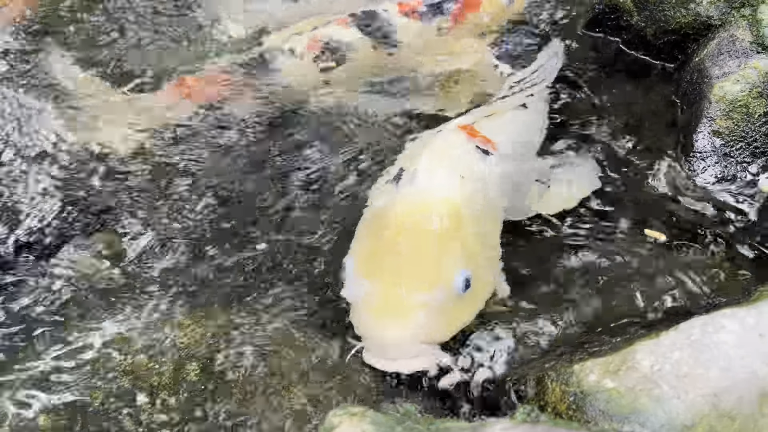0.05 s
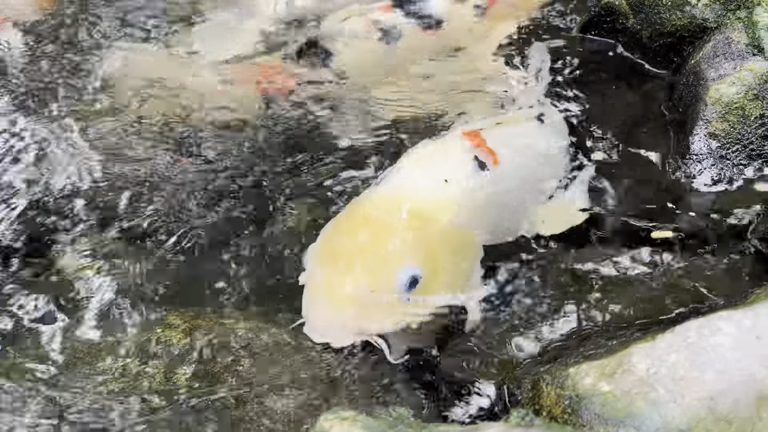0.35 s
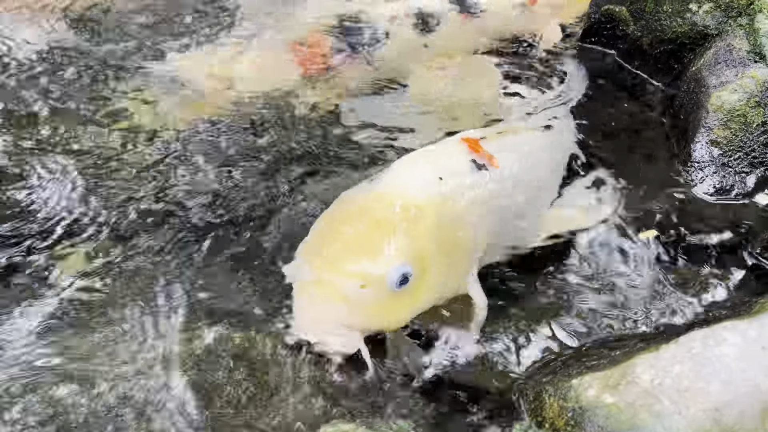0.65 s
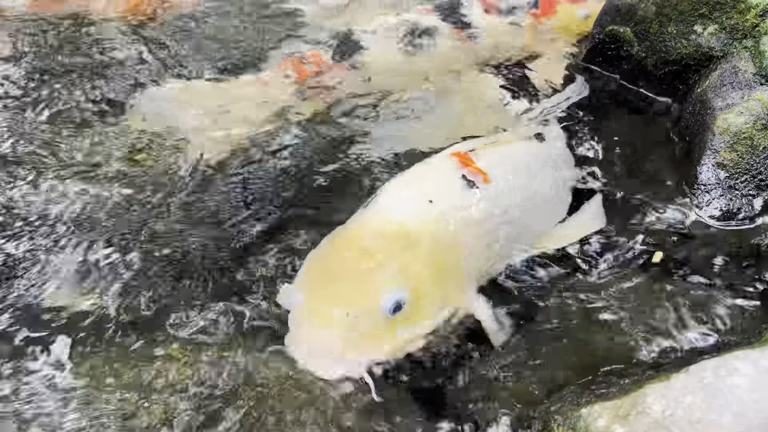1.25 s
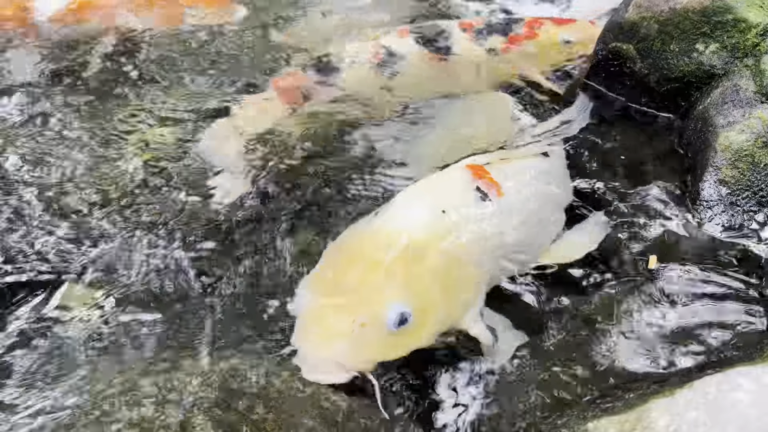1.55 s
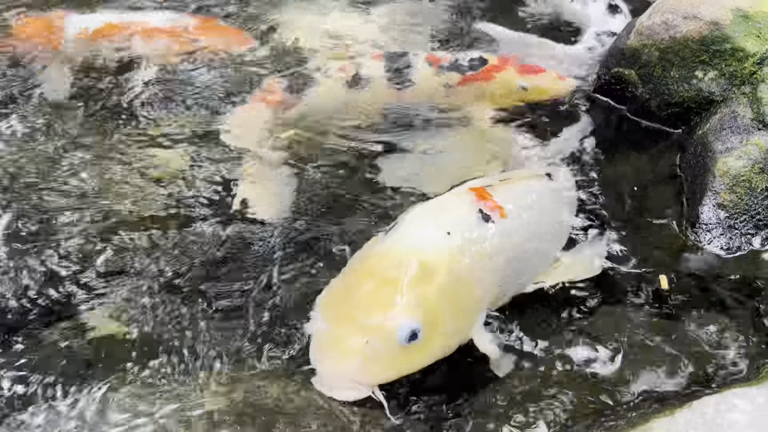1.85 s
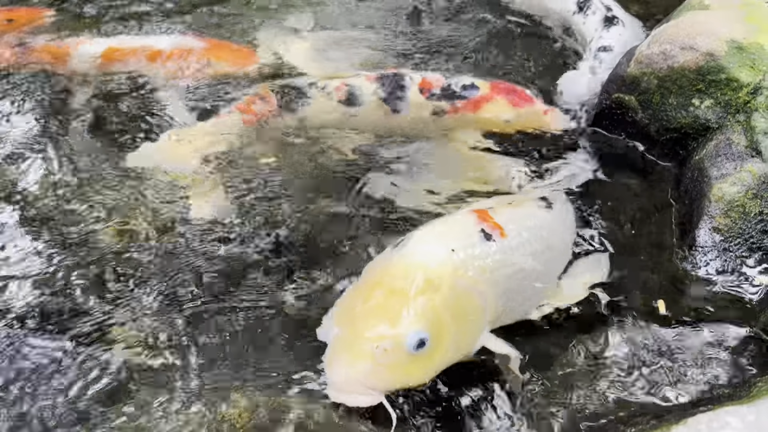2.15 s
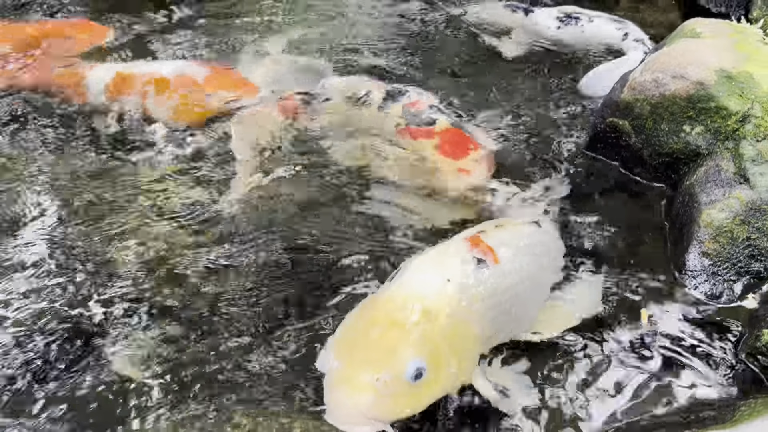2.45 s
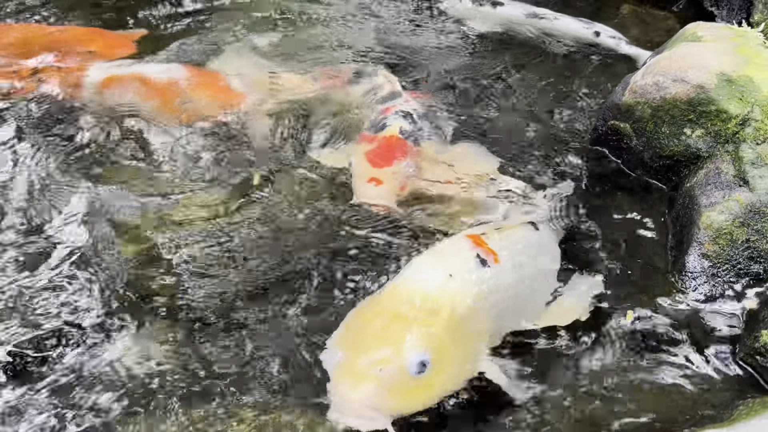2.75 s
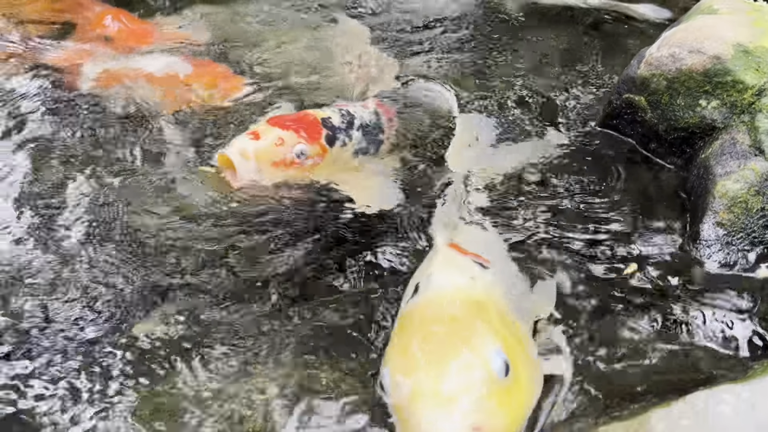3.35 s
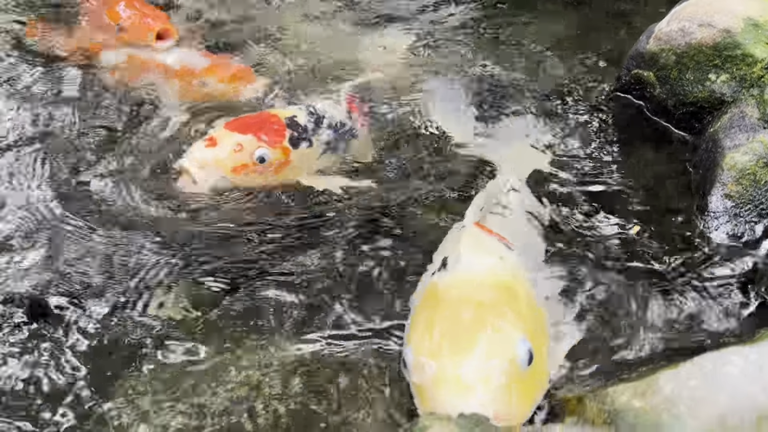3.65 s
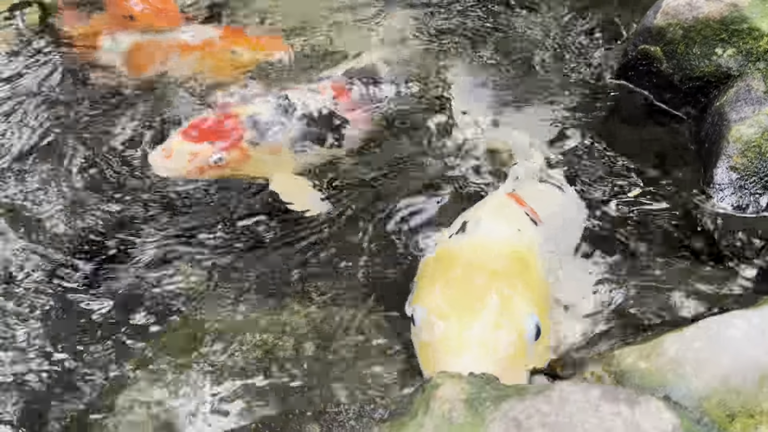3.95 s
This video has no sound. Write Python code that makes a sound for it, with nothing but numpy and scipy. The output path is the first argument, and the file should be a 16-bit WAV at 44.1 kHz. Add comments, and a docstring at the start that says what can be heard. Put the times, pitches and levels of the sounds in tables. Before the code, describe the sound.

Water rushes steadily into a pond, bubbling and hissing over a faint low drone. Close to the microphone, slightly left, carp slosh and plop at the surface; near the end one smacks loudly and gulps.

```python
"""A steady rush of water pouring into a carp pond, over a low pump-like drone.
The inflow is a dense wash of tiny ringing bubbles, coloured by hollows between the rocks, with a
hiss of fine spray on top. Close to the microphone, a little to the left, fish at the surface slosh
the water and set single bubbles ringing; near the end one smacks loudly and gulps."""
import sys
import numpy as np
from scipy import signal
from scipy.fft import rfft, irfft
from scipy.io import wavfile

SR = 44100
rng = np.random.default_rng(int(sys.argv[2]) if len(sys.argv) > 2 else 0)


def waveform_to_disk(signal):
    """Save audio, clipped to [-1, 1], as 16-bit WAV at the path in sys.argv[1]."""
    frames = np.transpose(np.atleast_2d(signal))
    scaled = np.clip(frames, -1, 1) * 32767
    samples = np.round(scaled).astype(np.int16)
    wavfile.write(sys.argv[1], SR, samples)


N = 176400
BABBLE_LOW_HZ, BABBLE_HIGH_HZ = 720, 3055  # mid-sized bubbles of the inflow
BUBBLE_ATTACK_CYCLES = 2.04


def undb(db):
    """Decibels to gain."""
    return 10 ** (np.asarray(db) / 20)


def level(x, db):
    """Set the rms level."""
    return x * undb(db) / np.sqrt(np.mean(x ** 2) + 1e-20)


def pan(db):
    """Left and right gains for a source db louder on the left."""
    return undb(np.array([np.atleast_1d(db), -np.atleast_1d(db)]) / 2)


def over_frequency(table, hz):
    """Read a table on a log-frequency axis."""
    f, value = np.array(table, float).T
    return np.interp(np.log(hz + 1), np.log(f), value)


def over_time(table):
    """Read a table of times and values at every sample."""
    return np.interp(np.arange(N) / SR, *np.array(table).T)


def bins():
    """Frequencies of a whole-length spectrum."""
    return np.arange(N // 2 + 1) * SR / N


def noise_spectrum():
    """Spectrum of white noise."""
    return rfft(rng.standard_normal(N))


def wander(rate):
    """Smooth random curve with spread 1, changing about rate times a second."""
    return level(irfft(noise_spectrum() * np.exp(-(bins() / rate) ** 2), N), 0)


def add(out, start, sound):
    """Mix a short sound in at a time in seconds."""
    i = int(np.clip(start * SR, 0, N - 1))
    out[..., i:i + sound.shape[-1]] += sound[..., :N - i]


def ring(hz, t60, glide=0, attack_cycles=BUBBLE_ATTACK_CYCLES):
    """A bubble: a sine that swells and dies away, its pitch moving by glide octaves a second."""
    t = np.arange(int(t60 * SR) + 8) / SR
    cycles = np.cumsum(np.minimum(hz * 2 ** (glide * t), SR / 2)) / SR
    attack = 1 - np.exp(-(cycles / attack_cycles) ** 2)
    return np.sin(2 * np.pi * cycles) * attack * np.exp(-np.log(1000) * t / t60)


def drone():
    """Low wavering resonances in the background, left of centre, as of a pump and its outfall."""
    # resonances: f/Hz, width/Hz, level/dB
    resonances = [(57.2, 6.9, -45.5), (71.6, 69, -49.5), (141.4, 31, -49.5), (319.1, 6.7, -58),
                  (365, 20, -60.5), (872, 15, -68.5)]
    # slow change of the whole hum: t/s, gain/dB
    trend = [(0, -2), (2.9, -1), (3.25, 1), (4, 1)]
    steadiness = 0.17  # 0 = wavers freely, 1 = constant strength
    f, hum = bins(), 0
    for hz, width, db in resonances:
        band = noise_spectrum() / (1 + (2 * (f - hz) / width) ** 2)
        tone = signal.hilbert(irfft(band, N))
        hum = hum + level(tone.real / (abs(tone) + 1e-9) ** steadiness, db)
    return hum * undb(over_time(trend)) * pan(4)


def hollows(spectrum):
    """Narrow resonances between the rocks colour the wash, shifting to and fro as the water moves."""
    f, spacing_hz = bins(), 44.5
    depth_db = 2 * np.clip(f / BABBLE_LOW_HZ - .5, 0, 1) / (1 + (f / BABBLE_HIGH_HZ) ** 2)
    ripples = [np.interp(f / spacing_hz, np.arange(1024), rng.standard_normal(1024)) for _ in range(2)]
    first, second = (irfft(spectrum * undb(depth_db * ripple), N) for ripple in ripples)
    share = .5 + .5 * np.tanh(2 * wander(rate=0.2))
    return rfft(first * share + second * (1 - share))


def rush():
    """The merged wash of the inflow, to the left: half-octave bands swell together and flicker alone."""
    # spectrum of the wash: f/Hz, relative density/dB
    colour = [(100, -10), (145, -4), (230, -8), (280, -8), (390, -6), (500, -14), (700, -15), (850, -12),
              (1100, -14), (1400, -12), (1850, -14.5), (2400, -14), (3200, -18), (4500, -20), (6500, -21),
              (8000, -25)]
    # its place between the microphones: f/Hz, left minus right/dB
    balance = [(60, 3.0), (110, 3.5), (200, 4.5), (380, 6.0), (700, 7.0), (1290, 2.5), (2380, 2.5),
               (4400, 5.0), (8120, 1.0), (15000, 0.0)]
    # likeness of the two channels: f/Hz, correlation/0-1
    likeness = [(100, 0.83), (300, 0.89), (640, 0.21), (1400, 0.27), (3000, 0.26), (5500, 0.014),
                (7000, 0.036), (9000, 0.028)]
    # slow change of the wash: t/s, relative level/dB
    trend = [(0, -1.5), (.8, 0), (1.8, -0.5), (2.6, -1), (3.3, -0.64), (4, 0)]
    f, low_hz, top_hz = bins(), 81, 7220
    swell_db = .4 * wander(rate=7.5) + over_time(trend)
    alike = np.clip(over_frequency(likeness, f), 0, 1)
    mid = noise_spectrum()
    side = noise_spectrum() * np.sqrt((1 - alike) / (1 + alike))
    passband = 1 / np.sqrt((1 + (low_hz / (f + 1)) ** 8) * (1 + (f / top_hz) ** 28))
    shape = undb(over_frequency(colour, f)) * pan(over_frequency(balance, f)) * passband
    wash = hollows(np.array([mid + side, mid - side]) * shape)
    half_octaves = 2 * np.log2(np.clip(f, 125, 8000) / 125)
    out = 0
    for k in range(13):
        band = irfft(wash * np.maximum(1 - abs(half_octaves - k), 0), N)
        out = out + band * undb(swell_db + 0.99 * wander(rate=28))
    return level(out, -41)


def spray():
    """Flickering hiss and ticks of the finest drops, reaching the right microphone first."""
    # filter on the bright, continuous hiss; its notch at 10 kHz is not the water's own: f/Hz, gain/dB
    hiss_filter = [(4500, -4), (5800, 4), (6600, 5), (8200, 6.5), (9000, 6.5), (10000, -53), (11000, 5),
                   (11900, 8.5), (14000, 1.5), (15800, 2.5)]
    # bursts of spray and lone drops: t/s, lift above the steady spray/dB, decay/s
    spurts = [(.362, 5, .002), (.615, 3, 0.028), (.6835, 8, 0.024), (.690, 5, .002), (1.067, 8, .002),
              (1.10, 4, 0.0091), (1.773, 7, .002), (2.4995, 10, 0.002), (2.53, 6, 0.043), (3.2485, 7, .002),
              (3.602, 10, 0.0023), (3.8555, 8, 0.0046)]
    f, t = bins(), np.arange(N) / SR
    drops = rng.standard_normal(N) * undb(3.5 * np.minimum(rng.exponential(1, N), 7))
    hiss = rng.standard_normal(N) + level(drops, -14)
    lift_db = sum(db * (t >= start) * np.exp(-abs(t - start) / decay) for start, db, decay in spurts)
    flicker_db = 0.96 * wander(rate=23)
    right = rfft(hiss * undb(flicker_db + lift_db)) * undb(over_frequency(hiss_filter, f))
    left = right * np.exp(-2j * np.pi * f * .148e-3)  # 0.148 ms later
    return level(irfft(np.array([left, right]), N), -47)


def bubble_swarm(low_hz, high_hz, cycles, spread_db, count):
    """Small bubbles of the inflow ring at random times, pitches and places, mostly left of centre."""
    out = np.zeros((2, N))
    rise_octaves, lag_span_s = 0.25, 0.00077  # rise over a bubble's life; lag between the microphones
    for when, pitch, size, side, lag in rng.random((count, 5)):
        hz = low_hz * (high_hz / low_hz) ** pitch
        strength = undb(-spread_db * np.log(max(size, .01)))
        bubble = strength * ring(hz, t60=cycles / hz, glide=rise_octaves * hz / cycles)
        left, right = bubble * pan(4 + 10 * (side - .5))
        add(out[0], when * N / SR, left)
        add(out[1], when * N / SR + lag_span_s * (lag - .5), right)
    return out


def slosh(start, length, db, first_hz, last_hz):
    """A fading cluster of short pops whose pitch drifts as the cavity changes."""
    count, scatter_octaves, fade_db, cycles = 28, 0.84, 5, 4.3
    out = np.zeros(N)
    for k, (when, pitch) in enumerate(rng.random((count, 2))):
        age = (k + when) / count
        hz = first_hz * (last_hz / first_hz) ** age * 2 ** (scatter_octaves * (2 * pitch - 1))
        pop = ring(hz, t60=cycles / hz, attack_cycles=0.85)
        add(out, start + age * length, (-1) ** k * undb(-fade_db * age) * pop)
    return out * undb(db) / np.sqrt(np.sum(out ** 2) / (length * SR) + 1e-20)


def single_bubbles():
    """Bubbles set ringing by the fish, from high plinks to low gulps."""
    # bubbles: t/s, f/Hz, level/dB, ring time/s, glide/(octaves per s)
    bubbles = [(.243, 845, -38, 0.046, 6), (.39, 626, -33.5, 0.063, 6), (.658, 904, -38, 0.027, 5),
               (.6825, 1700, -26, .018, -6), (.6875, 980, -30, 0.011, 0), (.687, 575, -27, 0.039, 0),
               (0.6945, 440, -19, 0.03, -4), (.765, 860, -38, 0.033, 11), (.868, 1270, -32, 0.027, 4),
               (1.005, 836, -35.5, 0.058, 5), (1.027, 870, -33, 0.045, -7), (1.074, 2110, -35, 0.044, -2),
               (1.076, 940, -35, 0.083, 26), (1.0995, 910, -18, .016, -4), (1.101, 290, -16, 0.028, -2),
               (1.113, 857, -34, 0.075, 5.5), (1.129, 1430, -35, 0.055, -7), (1.141, 850, -32, .035, -7),
               (1.151, 1420, -29.5, 0.028, 17), (1.189, 851, -30.5, .03, 1), (1.212, 762, -45, 0.22, 3.5),
               (1.234, 890, -38, .05, 5), (1.277, 853, -32.5, .035, 2), (1.424, 1360, -41.5, 0.14, 0),
               (1.452, 1870, -47, 0.08, 14.5), (1.537, 505, -36.5, 0.075, 13), (2.143, 533, -30, 0.08, 14),
               (2.559, 890, -30, 0.029, 18), (2.668, 850, -32, 0.034, -1), (3.487, 326, -20, 0.039, 3),
               (3.542, 283, -16, 0.048, -2), (3.574, 2790, -33, 0.027, -2), (3.726, 253, -28.5, 0.13, 1),
               (3.768, 570, -32, 0.023, 0), (3.7795, 560, -16.5, 0.022, 0), (3.778, 258, -16, 0.058, 0.5),
               (3.768, 2340, -33, 0.057, 1.5), (3.802, 2810, -40, 0.25, 0.5), (3.858, 3000, -32, .02, -3),
               (3.8838, 1430, -22, 0.016, 13)]
    out = np.zeros(N)
    for start, hz, db, t60, glide in bubbles:
        add(out, start, undb(db) * ring(hz, t60, glide))
    return out


def smacks():
    """A mouth or fin strikes the surface, which rings for a few milliseconds."""
    # strikes: t/s, level/dB, pitch as a multiple of the modes
    strikes = [(0.6830, -17.5, 0.75), (.6885, -21, .75), (1.1005, -20, 0.74), (1.1545, -24, 0.66),
               (3.553, -17, .72), (3.7394, -18, 0.67), (3.765, -2.5, 1), (3.7706, -25, 1.3),
               (3.7754, -22, .95), (3.782, -25, 0.9), (3.7856, -27, 1.2)]
    # modes of one smack: f/Hz, relative level/dB, ring time/s
    modes = [(800, -19, 0.0013), (1190, -1.5, 0.0036), (2320, -7, 0.0049)]
    out = np.zeros(N)
    for start, db, pitch in strikes:
        for hz, mode_db, t60 in modes:
            add(out, start, undb(db + mode_db) * ring(hz * pitch, t60, attack_cycles=0.31))
    out = signal.sosfilt(signal.butter(8, 3340, fs=SR, output="sos"), out)
    return signal.sosfilt(signal.butter(2, 354, "high", fs=SR, output="sos"), out)


def fish():
    """Carp smack, slosh and stir up bubbles close to the microphone, a little to the left."""
    # sloshes: t/s, length/s, level/dB, starting f/Hz, final f/Hz
    sloshes = [(0.503, 0.063, -53, 1300, 1700), (.683, 0.014, -37, 1030, 824),
               (0.697, 0.097, -47, 1750, 1090), (.865, 0.031, -49, 1220, 1100),
               (1.07, 0.027, -50, 1200, 1160), (1.115, 0.055, -51.5, 1320, 1410),
               (1.11, 0.075, -46, 282, 266), (1.398, 0.5, -64, 1620, 1900),
               (2.164, 0.054, -45.5, 1600, 1400), (2.461, 0.19, -52, 1170, 1080),
               (2.61, 0.11, -60, 1500, 1200), (3.483, 0.061, -50.5, 295, 356),
               (3.555, 0.06, -49, 980, 1540), (3.712, 0.045, -41, 217, 272),
               (3.735, 0.02, -44.5, 990, 1410), (3.768, 0.025, -39, 1510, 1310),
               (3.763, 0.039, -38.5, 197, 227), (3.858, 0.011, -44, 3150, 2490),
               (3.894, 0.1, -50, 1330, 1230)]
    return (smacks() + single_bubbles() + sum(slosh(*row) for row in sloshes)) * pan(7)


def scene():
    """At the pond's edge: inflow and drone behind, fish in front."""
    babble = bubble_swarm(BABBLE_LOW_HZ, BABBLE_HIGH_HZ, cycles=68, spread_db=2.5, count=420)
    fizz = bubble_swarm(low_hz=2582, high_hz=6950, cycles=107, spread_db=-0.5, count=900)
    inflow = rush() + spray() + level(babble, -53.5) + level(fizz, -53.5)
    return inflow + drone() + fish()


def record(dry):
    """The microphone drops the deepest bass and cuts the top."""
    low_hz, top_hz = 40, 15800
    thin = signal.sosfilt(signal.butter(4, low_hz, "high", fs=SR, output="sos"), dry)
    return signal.sosfilt(signal.ellip(10, .1, 80, top_hz, fs=SR, output="sos"), thin)


dry = scene()
out = record(dry)
waveform_to_disk(out)
```